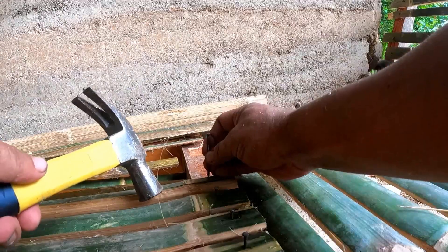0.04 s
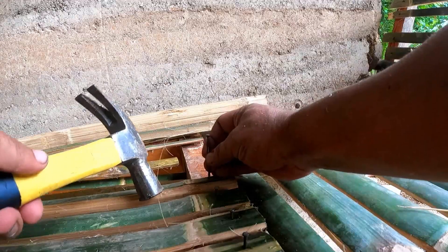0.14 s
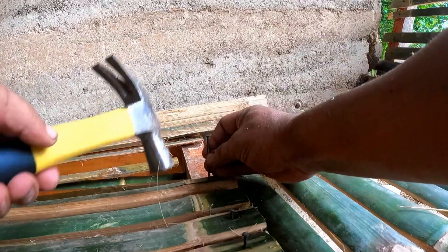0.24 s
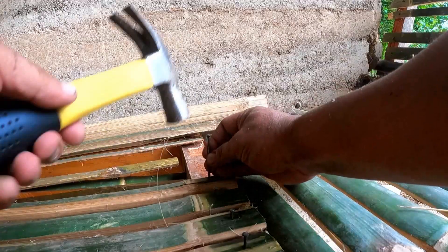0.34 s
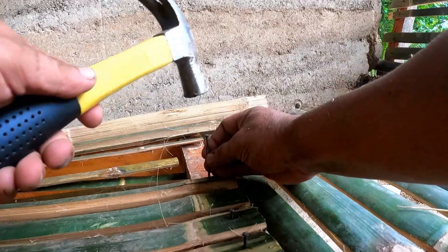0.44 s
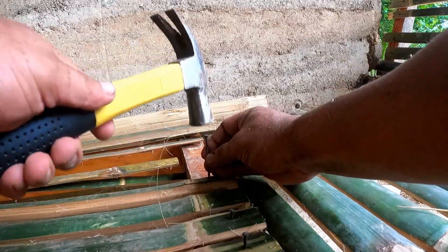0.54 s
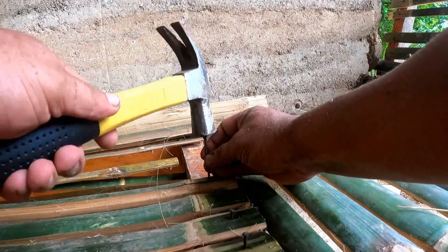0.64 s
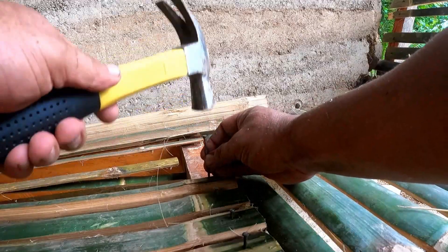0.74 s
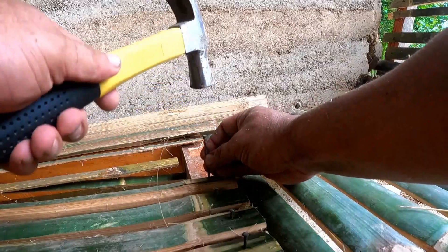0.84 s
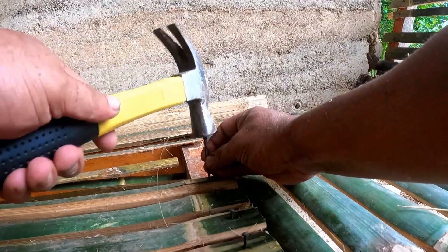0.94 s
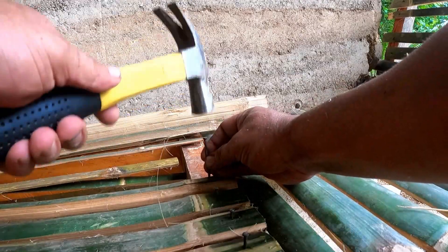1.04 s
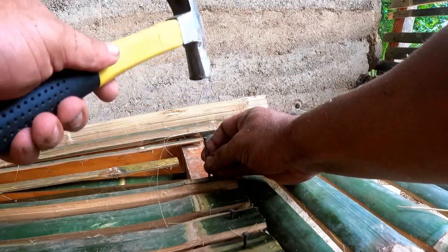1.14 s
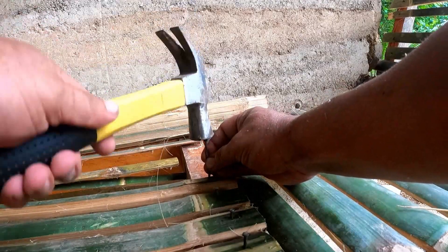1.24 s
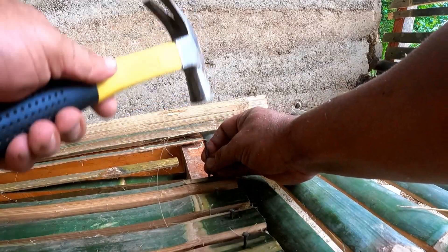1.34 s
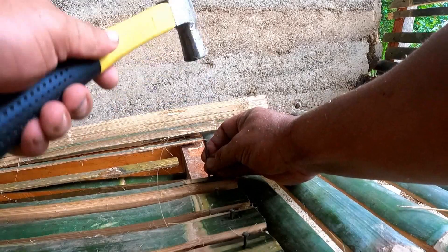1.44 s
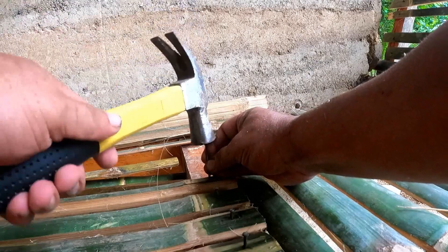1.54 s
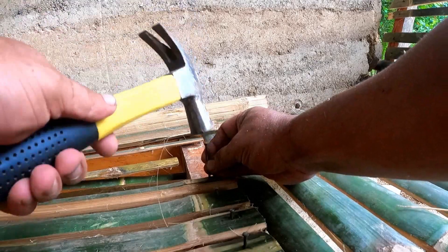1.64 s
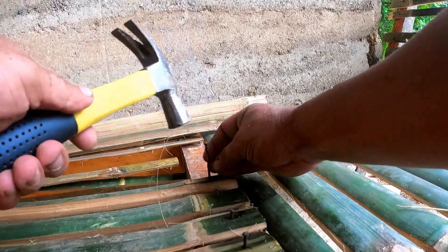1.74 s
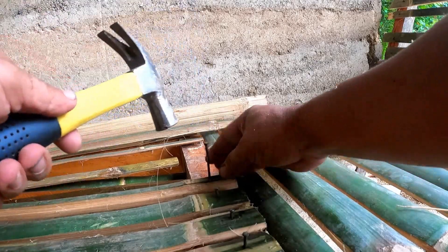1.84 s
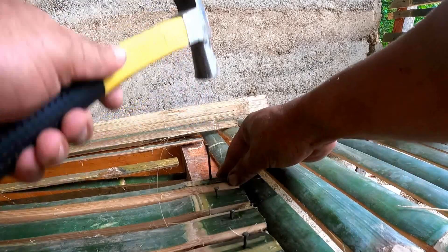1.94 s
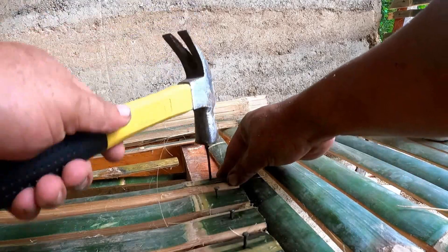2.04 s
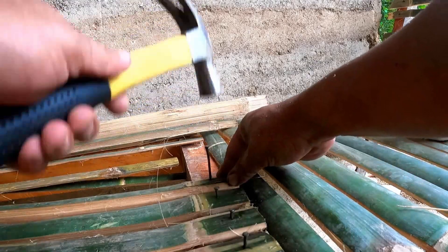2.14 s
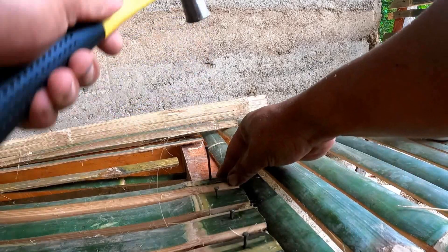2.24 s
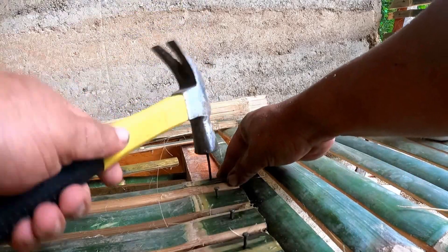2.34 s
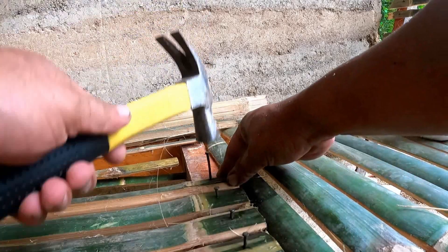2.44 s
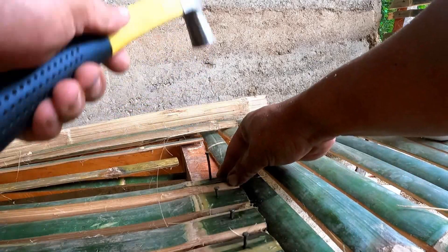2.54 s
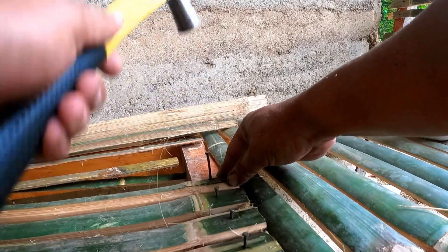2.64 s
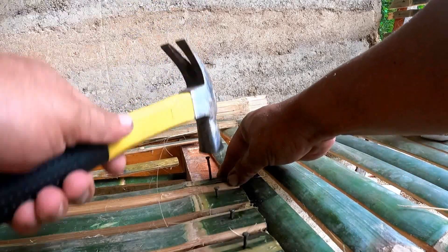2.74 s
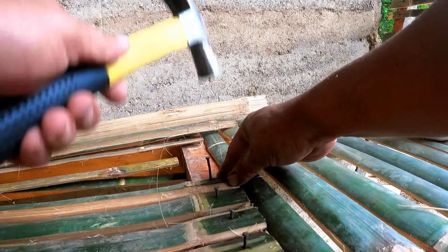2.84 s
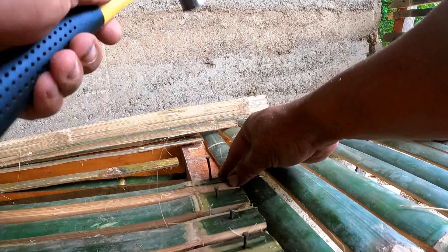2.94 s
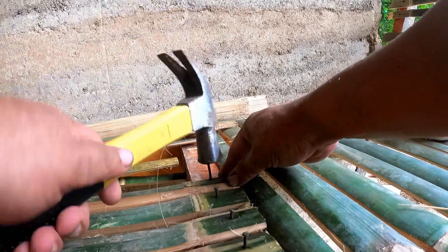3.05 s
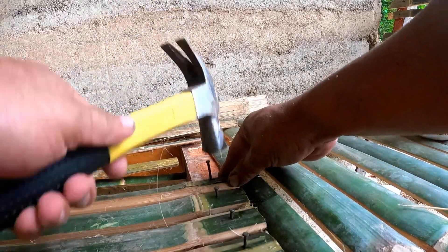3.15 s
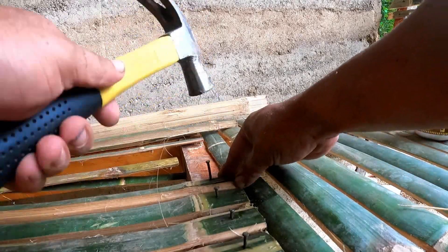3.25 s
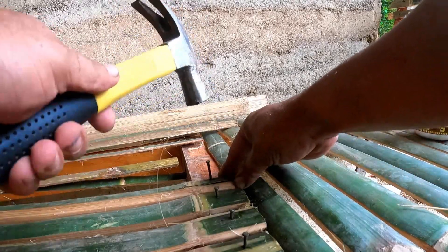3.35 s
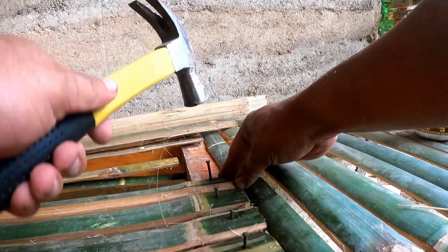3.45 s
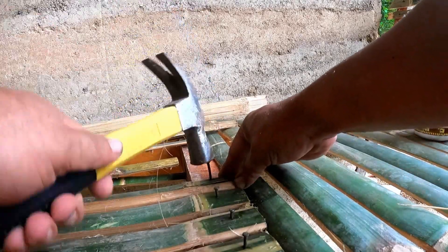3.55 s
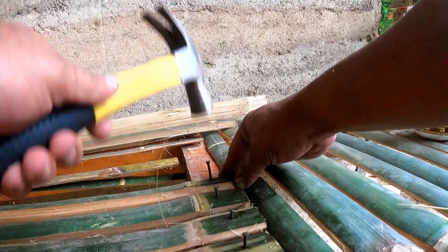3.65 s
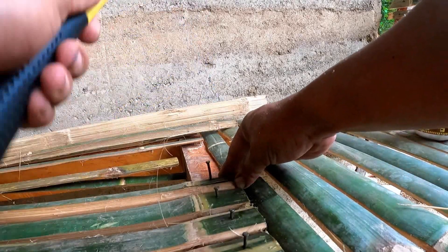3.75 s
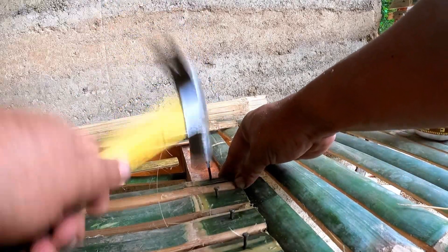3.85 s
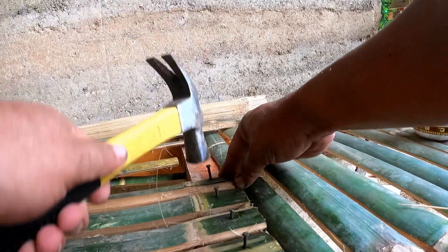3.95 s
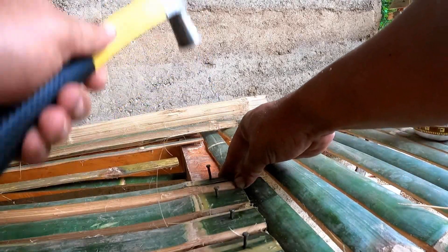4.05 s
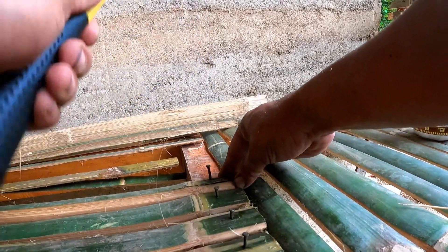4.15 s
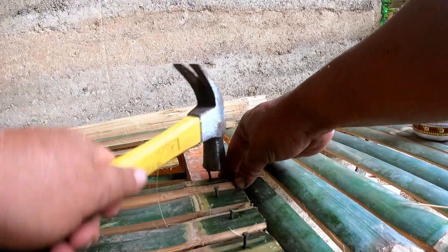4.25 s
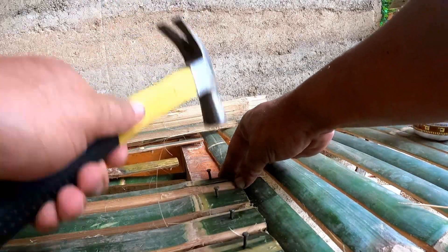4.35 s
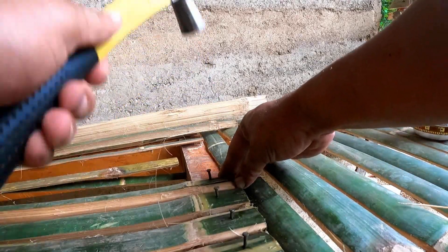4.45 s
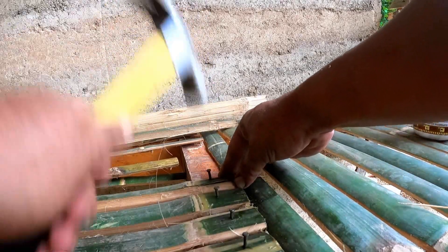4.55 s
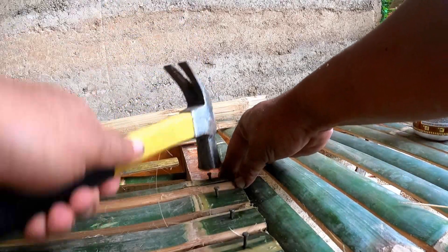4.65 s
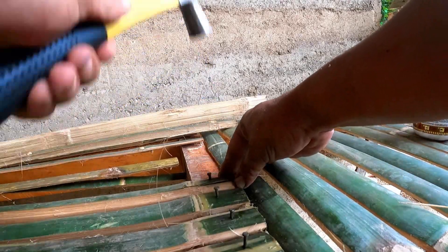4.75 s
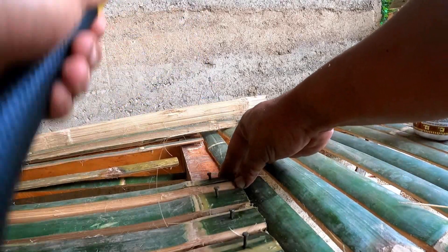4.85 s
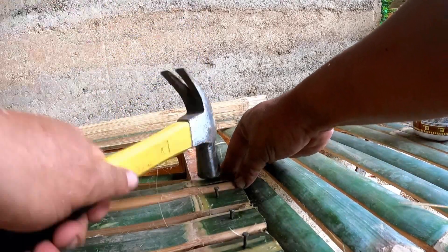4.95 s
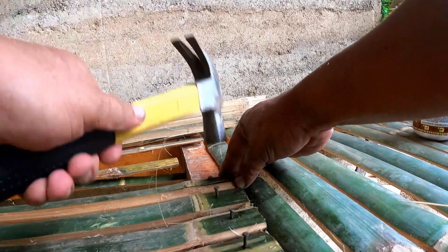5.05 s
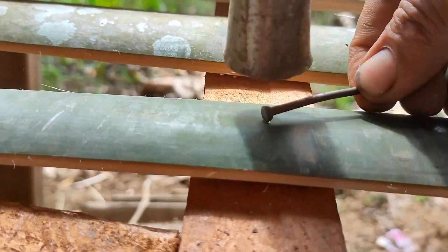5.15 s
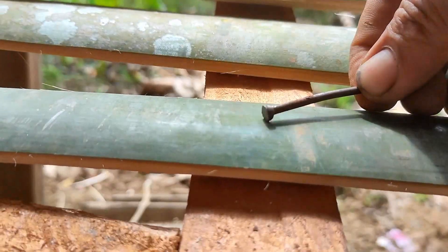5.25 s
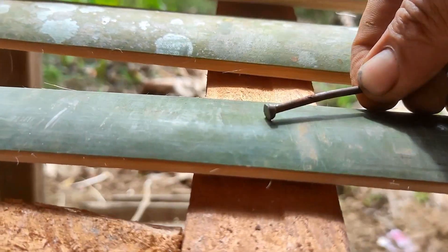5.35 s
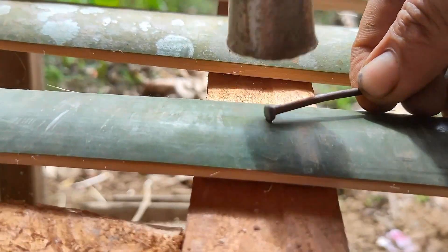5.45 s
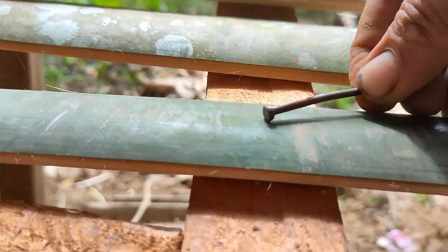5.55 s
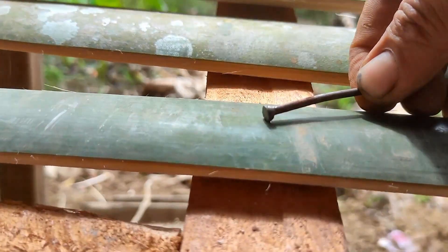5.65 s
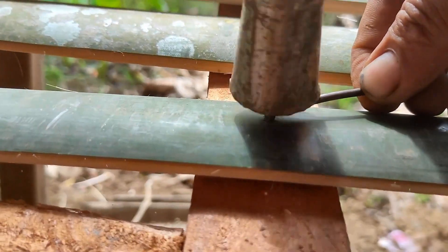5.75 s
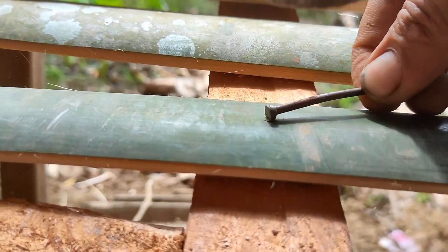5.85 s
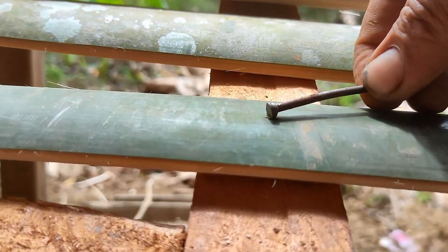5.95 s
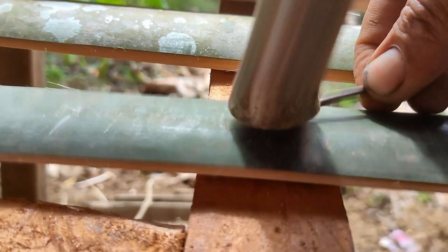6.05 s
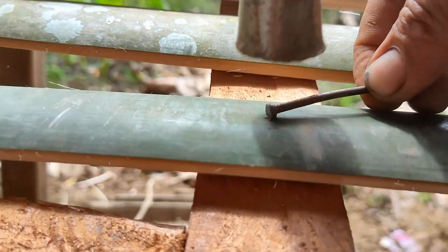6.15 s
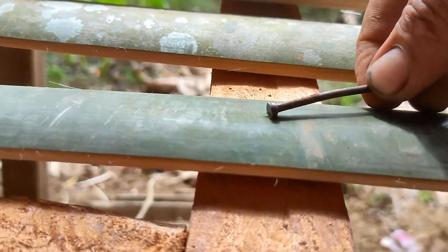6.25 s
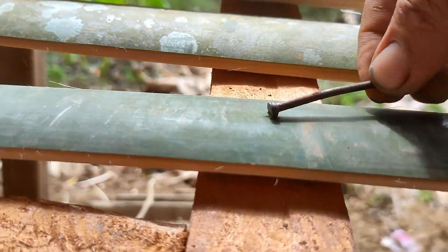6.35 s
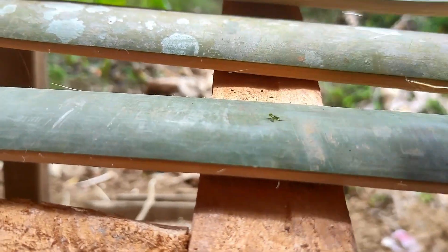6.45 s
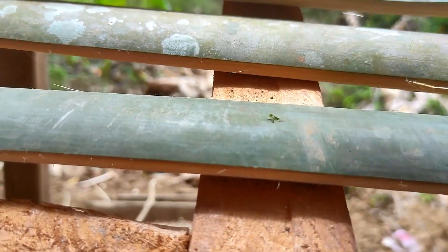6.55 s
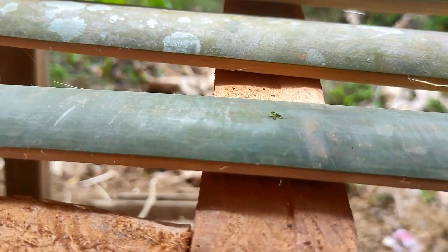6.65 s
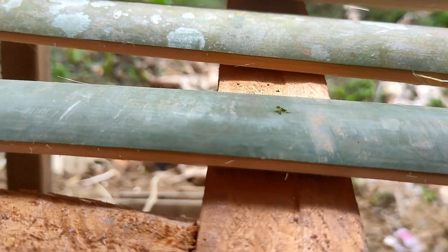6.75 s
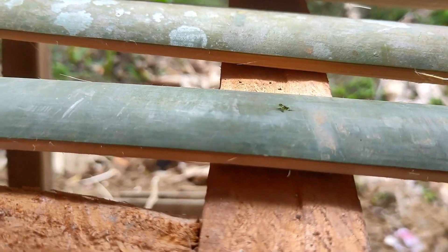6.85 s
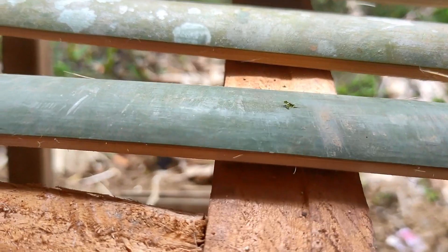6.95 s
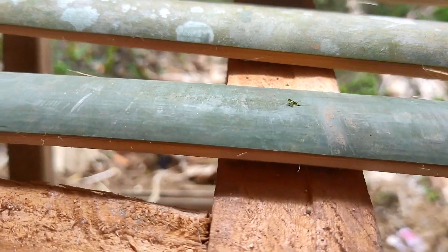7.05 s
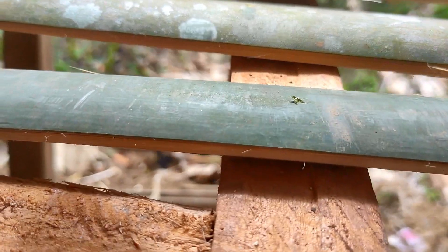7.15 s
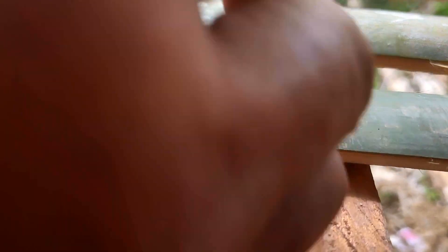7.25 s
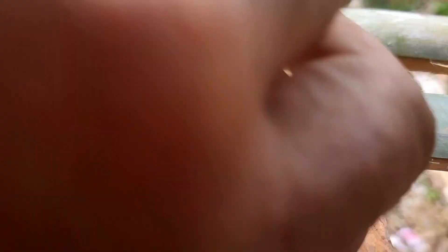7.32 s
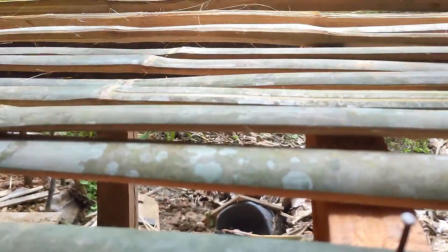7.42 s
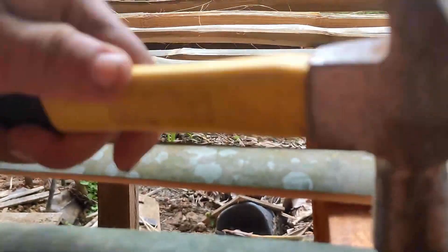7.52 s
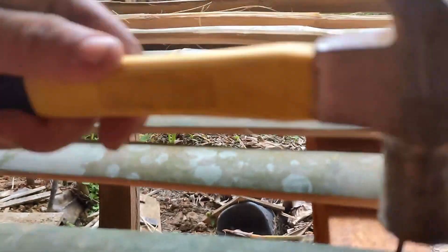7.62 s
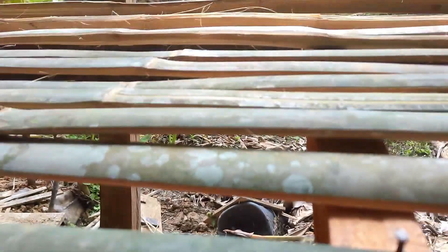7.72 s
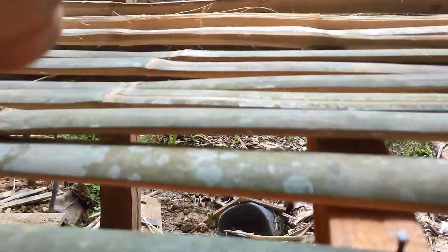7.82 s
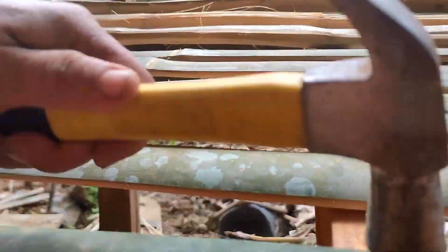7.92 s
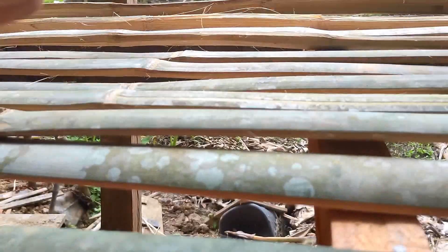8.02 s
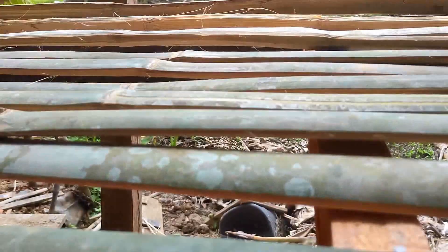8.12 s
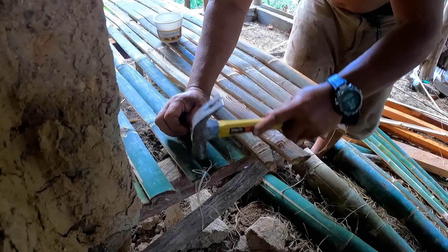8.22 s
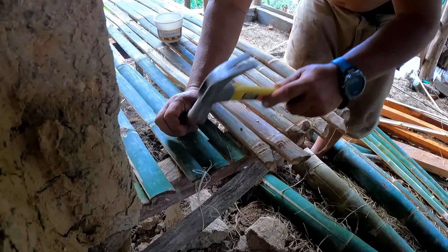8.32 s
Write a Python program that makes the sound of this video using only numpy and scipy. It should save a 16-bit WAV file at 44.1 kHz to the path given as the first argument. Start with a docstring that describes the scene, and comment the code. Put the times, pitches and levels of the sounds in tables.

```python
"""Outdoors, nails are hammered into a deck of split bamboo, heard in five shots cut together.
First, from the deck itself and in the centre: insects swell in, nail and hammer are handled softly, and blows
crack, shake the frame and make slats and loose nails bounce; modes and noise bands die away at their own rates.
Then, from close by and almost wholly at the left: dry clacks with a long, dark reverberation, soft bumps of the
hand and a far insect tone. Last, the deck returns for a moment, on the tail of one more blow."""
import sys
import numpy as np
from scipy import signal
from scipy.fft import rfft, irfft, next_fast_len
from scipy.io import wavfile
from scipy.ndimage import uniform_filter1d

SR = 44100
rng = np.random.default_rng(int(sys.argv[2]) if len(sys.argv) > 2 else 0)


def unload_audio(sound):
    """Save the sound as a 16-bit wav file, at the path given as the first command line argument."""
    columns = np.transpose(np.atleast_2d(sound))
    # keep every value between -1 and 1, then stretch to whole-number steps
    steps = np.round(np.clip(columns, -1, 1) * 32767)
    wavfile.write(sys.argv[1], SR, steps.astype(np.int16))


N = 369558

# All levels in the tables are relative.
# Shots from the deck. Each row: start in seconds, end in seconds.
DECK_SHOTS = [(-.01, 2.1), (2.1, 5.224), (8.287, 8.4)]
# Shots from close by. Each row: start in seconds, end in seconds, fade-out in seconds.
CLOSE_SHOTS = [(5.27, 7.485, .5), (7.495, 8.287, .003)]
# Blows heard from the deck; the first and the last fall just before their shot opens. Each row: start in
# seconds, then crack, steel tick, frame thump, slat clatter and faint fore-tick in dB, flight of the nails in
# seconds, their ring in dB, flight of the loose slat in seconds, its knock in dB.
DECK_BLOWS = [(-.4, -10, -5, -2, 1.5, -40, .04, -30, .1, -25),
              (0.9107, -15.5, -6, -4.5, -12, -39, .03, -55, 0.12, -38),
              (1.2295, -27.5, 3.5, -1, -1.5, -27.5, 0.038, -38.5, 0.07, -10.5),
              (1.5276, -4.5, 3, -1.5, 0, -25.5, .032, -14.5, 0.11, -25.5),
              (1.8188, -6.5, 1, -3, -3, -23, 0.046, -34, 0.11, -19),
              (2.305, -5, 4, -0.5, -4.5, -9, 0.031, -15, 0.11, -26),
              (2.6618, -4.5, 8.5, -1, -4, -21, 0.038, -20.5, 0.11, -16.5),
              (3.008, -7, 6, -2.5, -0.5, -27, 0.046, -19, 0.13, -25),
              (3.3538, -5.5, 7.5, -2, 2, -25, .039, -12.5, 0.1, -12.5),
              (3.829, -5, -18.5, -2, -2.5, -24, .031, -20.5, .043, -22),
              (4.170, -2.5, 5.5, -2, 1, -23, 0.048, -16, 0.1, -11.5),
              (4.5358, -5.5, 6.5, -4.5, 2, -24.5, 0.078, -22.5, .09, -16),
              (4.8886, -6.5, 4.5, -3, 1, -25.5, 0.045, -22, 0.12, -22.5),
              (8.21, 7, -2, -5.5, -6.5, -40, 0.039, -34, 0.042, -30)]
# Crack of the blow. Each row: frequency in Hz, level in dB per Hz, t60 in seconds.
CRACK_BANDS = [(250, 4, 0.014), (600, -11, 0.0092), (1350, 9, 0.012), (1900, -2, 0.012), (2840, -19, 0.013),
               (6000, -12.5, 0.042), (12500, -24, 0.023)]
# Hammer face on the nail head. Each row: frequency in Hz, level in dB, t60 in seconds.
CONTACT_MODES = [(1300, -1, .014), (1800, 1, .013), (2200, -5, .009)]
# Single bamboo slat. Each row: frequency in Hz, level in dB, t60 in seconds.
SLAT_MODES = [(759.5, -18.5, 0.038), (958, -18.5, 0.16), (1099, -15.5, 0.11), (1265, -11, 0.085),
              (1448, -17, 0.08), (1761, -14.5, 0.058), (2038, -14.5, 0.048)]
# Steel tick of the blow. Each row: frequency in Hz, level in dB per Hz, t60 in seconds.
STEEL_BANDS = [(1500, 4, 0.0021), (2960, -18, 0.01), (5460, -3.5, 0.0086), (8230, -5, 0.0089),
               (10100, -12.5, 0.01), (15800, 2, 0.0019)]
# Heavy frame of the deck. Each row: frequency in Hz, level in dB, t60 in seconds.
FRAME_MODES = [(50.6, -31, 1.2), (74.1, -24, 3.6), (99.7, -25, 1.7), (119, 8, 0.037), (162.8, -15.5, .26),
               (205, -27, 0.4), (278, -39, .2), (297.4, -23.5, 0.43)]
# Shaking of all the slats. Each row: frequency in Hz, level in dB per Hz, t60 in seconds.
CLATTER_BANDS = [(25.04, -8, 1.8), (45, 8, 1), (94, -9, 1.1), (173, 1, 1.01), (295, -5, 0.79),
                 (623, -14.5, 0.67), (1290, -12.5, 0.4), (2290, -15, 0.3), (2780, -19, 0.32),
                 (6500, -24.5, 0.26), (9900, -44, 0.26), (15000, -45.5, 0.11)]
# Loose nails ringing. Each row: frequency in Hz, level in dB, t60 in seconds.
NAIL_MODES = [(2565, -18, .08), (3368, 0, .1), (3392, -9, .07), (4022, -6, .095), (4328, -14, .07),
              (4817, -13, .08), (4974, -8, .1), (6042, -9, .09), (6880, -15, .06), (7860, -13, .06)]
# Loose nails buzzing on the slats. Each row: frequency in Hz, level in dB per Hz, t60 in seconds.
BUZZ_BANDS = [(1813, -21.5, .06), (2900, -3.5, 0.1), (4500, -6, 0.1), (6440, -15.5, 0.11), (9000, -22, .05),
              (14000, -36, .04)]
# Slat knocking on its beam. Each row: frequency in Hz, level in dB per Hz, t60 in seconds.
KNOCK_BANDS = [(300, 6.5, 0.064), (1100, 7, 0.061), (2200, 5, 0.02), (4030, -7.5, 0.063),
               (7530, -28, 0.024), (14000, -31.5, .03)]
# Insect chorus around the deck. Each row: frequency in Hz, level in dB per Hz.
INSECT_COLOUR = [(2000, -38), (3400, -8.5), (3850, 2.5), (4350, 2), (4850, -13.5), (6400, -16.5), (7400, 7),
                 (8400, 0), (9300, -2.5), (10100, -2), (10700, -3.5), (11600, 0), (12800, -10.5),
                 (14500, -27), (16000, -42)]
# Low sway of the deck in outdoor air. Each row: frequency in Hz, level in dB per Hz.
SWAY_COLOUR = [(20, -20), (40, -2), (68, 6.5), (110, -20), (300, -30), (600, -40.5), (1400, -34.5),
               (3000, -47), (8000, -54.5)]
# Trembling slats. Each row: frequency in Hz, level in dB per Hz.
TREMBLE_COLOUR = [(60, -18.5), (130, -4), (200, 3), (320, -3), (450, -13), (800, -41), (2000, -50)]
# Light scuffs of nail and hammer being handled. Each row: start in seconds, level in dB, length in seconds.
SCUFFS = [(0.177, -31, 0.042), (0.361, -39, .03), (0.639, -28.5, .09)]
# Tiny tick within a scuff. Each row: frequency in Hz, level in dB per Hz, t60 in seconds.
TICK_BANDS = [(300, -15, 0.016), (1500, -0.5, 0.023), (3500, -6, 0.033), (7000, -2, .025),
              (15000, -20, .02)]
# How much the two microphone ports differ on the deck. Each row: frequency in Hz, side against mid in dB.
PORT_WIDTH = [(20, -20), (200, -20), (380, -12.5), (1290, -8), (2400, -6), (8000, -6), (15000, -6.5)]
# Blows heard from close by. Each row: start in seconds, then clack level, treble, hollow ring
# and reverberation in dB.
CLOSE_BLOWS = [(5.244, 4, -11, -19, -0.5), (5.5871, 1.5, -1, -15, 4.5), (5.927, 0.5, 3, -17, 7),
               (6.249, 2.5, -1, -18, 9), (7.439, -13.5, 10, -11, 5), (7.7755, -8.5, 11, -3, 8),
               (8.0935, -5.5, 11.5, 2.5, 11.5)]
# Dry bamboo clack. Each row: frequency in Hz, level in dB per Hz, t60 in seconds.
CLACK_BANDS = [(51, -39, 0.26), (177, 7.5, 0.098), (388, -1.5, 0.19), (694, 2, 0.17), (1100, 0.5, 0.19),
               (1950, 1, 0.14), (2550, -8, 0.2), (3470, -1.5, 0.1), (5060, -21, 0.14), (6800, -6.5, 0.11),
               (9260, -19.5, 0.084), (15500, -22.5, 0.098)]
# Hollow ring of the bamboo. Each row: frequency in Hz, level in dB per Hz, t60 in seconds.
HOLLOW_BANDS = [(150, -11, .2), (360, 0.5, 0.23), (665, 4, 0.25), (900, -13, 0.24), (1500, -21.5, .1)]
# Reverberation of the close blows. Each row: frequency in Hz, level in dB per Hz, t60 in seconds.
REVERB_BANDS = [(39.94, -38, 1.5), (100, -19, 3.5), (141, -17, 1.36), (206, -6.5, 1.45), (284, -11.5, 1.02),
                (464, -9.5, 0.93), (696, -19, 0.83), (1010, -27.5, 0.86), (2010, -36, 1.04),
                (3620, -35, 0.59), (5460, -40.5, 0.44), (6750, -33.5, 0.59), (9750, -56.5, 0.97),
                (15500, -54.5, 0.76)]
# Thin, far insect tone of the close shots. Each row: frequency in Hz, level in dB per Hz.
TRILL_COLOUR = [(2000, -13), (6000, -13.5), (8400, -6.5), (8740, 3.5), (9100, -7), (9800, 0.5),
                (10500, -9.5), (13000, -16.5)]
# Still air of the close shots. Each row: frequency in Hz, level in dB per Hz.
STILL_COLOUR = [(30, -11), (150, 0), (300, -7), (600, -7.5), (2000, -16), (4000, -25), (9000, -39)]
# Faint air, nearly all that the right channel holds in the close shots.
# Each row: frequency in Hz, level in dB per Hz.
RIGHT_AIR_COLOUR = [(30, -4), (70, -11), (140, -3.5), (270, -1), (600, -6), (1300, -13), (3000, -20.5),
                    (7000, -29), (15000, -33)]
# Soft bumps of the hand on the slats. Each row: start in seconds, level in dB.
BUMPS = [(6.845, -17.5), (6.914, -2.5), (6.981, -17), (7.116, -25)]
# Sound of one bump. Each row: frequency in Hz, level in dB per Hz, t60 in seconds.
BUMP_BANDS = [(40.5, -25, 0.1), (110, 6.5, 0.12), (233, 2.5, 0.088), (410, -16, 0.05), (643, -40, 0.045),
              (1200, -65, .04)]

TIME = np.arange(N) / SR
AGE = TIME[:int(1.6 * SR)]  # seconds since a single sound began
FORE_TICK_S = 0.0093  # a faint tick with the colour of the crack comes this far ahead of it
# each rebound keeps a share of the flight before it and loses some level
NAIL_REBOUND, NAIL_LOSS_DB = .5, 4.5
SLAT_REBOUND, SLAT_LOSS_DB = .26, 5
JOLT_DB = 0.5  # how strongly the landing slat sets the nails off again
# sway and trembling at rest, what a blow with a 0 dB thump adds, and how long that takes to settle
SWAY_REST_DB, TREMBLE_REST_DB = -41.5, -66
SWAY_DB, TREMBLE_DB, SETTLE_T60_S = -32, -40.5, 2.45
# insects before suppression, how far below that they start, and the time constant of their swell
INSECT_DB, SWELL_DB, SWELL_S = -41.5, 6, 0.44
# the suppressor of the insects: treble level where it starts to act, ratio, averaging time constant
DUCK_THRESHOLD_DB, DUCK_RATIO, DUCK_AVERAGE_S = -49, 10, 2.5
STILL_DB, TRILL_DB, RIGHT_AIR_DB, RIGHT_LEAK_DB = -61, -62.5, -57.5, -44
DECK_TOP_HZ, TOP_HZ = 12500, 16000  # upper limits of the deck ports and of the whole sound


def undb(db):
    """Turn decibels into an amplitude factor."""
    return 10 ** (np.asarray(db) / 20)


def decay(t, t60):
    """Exponential decay that loses 60 dB in t60 seconds."""
    return np.exp(-np.log(1000) * t / t60)


def fade(t60):
    """Decay over the age of a single sound; one minus it is a soft onset."""
    return decay(AGE, t60)


def add(track, s, sound):
    """Mix a sound into a track from time s on; what falls outside the track is lost."""
    i = int(s * SR)
    part = sound[max(0, -i):len(track) - i]
    first = max(0, i)
    track[first:first + len(part)] += part


def shot(start, end, fade_s=.001):
    """Open only while the shot lasts; it may fade out at its end."""
    gate = (TIME > start) * np.clip((end - TIME) / fade_s, 0, 1)
    return uniform_filter1d(gate, size=128)


def log_place(n, hz, values):
    """Interpolate values over log frequency for the bins of an n-point spectrum."""
    bins_hz = np.arange(n // 2 + 1) * SR / n
    return np.interp(np.log(bins_hz + 1), np.log(hz), values)


def tint(x, spectrum):
    """Give a sound a colour by filtering its spectrum with (Hz, dB) points."""
    hz, db = np.transpose(spectrum)
    n = next_fast_len(N, True)
    gain = undb(log_place(n, hz, db))
    return irfft(rfft(x, n) * gain, n)[:N]


def hiss(spectrum):
    """Steady noise of unit rms with a given colour."""
    x = tint(rng.standard_normal(N), spectrum)
    return x / x.std()


def dense(bands, treble_db=0):
    """Countless close modes: noise in which each band dies at its own rate."""
    hz, db, t60 = np.transpose(bands)
    length_s = min(1.3, 1.5 * t60.max())
    n = next_fast_len(int(length_s * SR), True)
    # neighbouring bands overlap as triangles on a log-frequency axis
    index = np.arange(len(hz))
    shares = np.maximum(0, 1 - abs(log_place(n, hz, index) - index[:, None]))
    parts = irfft(shares * rfft(rng.standard_normal(n)), n)
    gains = undb(db + treble_db * hz / (hz + 3000))
    sound = gains @ (parts * decay(AGE[:n], t60[:, None]))
    return np.pad(sound, (0, len(AGE) - n))


def ring(modes, detune, scatter_db):
    """Single modes set off at once; each blow weights and tunes them a little differently."""
    out = np.zeros(len(AGE))
    for hz, db, t60 in modes:
        a, b = rng.standard_normal(2)
        t = AGE[:int(1.2 * t60 * SR)]
        wave = np.sin(2 * np.pi * hz * (1 + detune * a) * t)
        out[:len(t)] += undb(db + scatter_db * b) * wave * decay(t, t60)
    return out


def chatter(sound, spread_s, count):
    """A loose piece touches down once, then again at chance moments, more lightly the later they fall."""
    out = sound.copy()
    for u, size in rng.uniform(0, 1, (count, 2)):
        i = 1 + int(u * spread_s * SR)
        out[i:] += (1 - u) * size * sound[:-i]
    return out


def crack():
    """Hammer face and nail head ring briefly while the slat under them cracks and rings."""
    contact = ring(CONTACT_MODES, detune=0.072, scatter_db=-3.0)
    slat = ring(SLAT_MODES, detune=0.0042, scatter_db=4.0)
    return dense(CRACK_BANDS) + contact + undb(-2.5) * slat


def frame_thump():
    """The heavy frame is pushed down and gives way after the crack."""
    return -ring(FRAME_MODES, detune=0.013, scatter_db=1.5) * (1 - fade(.028))


def rattle(count, spread_s, db):
    """Slats chattering on their beams: small knocks at chance moments, the later the weaker."""
    out = np.zeros(len(AGE))
    for u, size in rng.uniform(0, 1, (count, 2)):
        i = 1 + int((0.011 + u * spread_s) * SR)
        knock = ring(SLAT_MODES, detune=0.033, scatter_db=4.0)
        out[i:] += undb(db - 10 * u) * (.5 + size) * knock[:-i]
    return out


def clatter():
    """The shaking takes a moment to spread through the slats, and keeps the loose nails humming."""
    slats = dense(CLATTER_BANDS) * (1 - fade(0.0057)) + rattle(count=12, spread_s=.115, db=-19)
    nails = chatter(ring(NAIL_MODES, detune=0.00089, scatter_db=-2.0), spread_s=0.081, count=8)
    return slats + undb(-25) * nails


def deck_blow(crack_db, steel_db, thump_db, clatter_db):
    """Steel meets the nail, the slat cracks, the frame is pushed down and the whole deck rattles."""
    out = undb(crack_db) * crack()
    out += undb(steel_db) * dense(STEEL_BANDS)
    out += undb(thump_db) * frame_thump()
    return out + undb(clatter_db) * clatter()


def nail_jingle():
    """The nails lying on the slats buzz and jingle."""
    nails = ring(NAIL_MODES, detune=0.00092, scatter_db=1.5) + undb(2.5) * dense(BUZZ_BANDS)
    return chatter(undb(-5) * nails, spread_s=.018, count=2) * (1 - fade(0.0041))


def slat_knock():
    """A slat knocks back on its beam."""
    wood = dense(KNOCK_BANDS) + undb(1.5) * ring(SLAT_MODES, detune=0.006, scatter_db=-2.5)
    return chatter(undb(-6) * wood, spread_s=0.036, count=3) * (1 - fade(0.0056))


def landings(touch, flight_s, rebound, loss_db, count):
    """A piece thrown up by a blow lands after its flight, then hops on, each hop shorter and weaker."""
    out = np.zeros(len(AGE))
    flights = flight_s * rebound ** np.arange(count)
    for k, s in enumerate(np.cumsum(flights)):
        add(out, s, undb(-k * loss_db) * touch())
    return out


def loose_pieces(nail_s, nail_db, slat_s, slat_db):
    """Loose nails and a loose slat come down again; the slat jolts the nails once more."""
    out = undb(nail_db) * landings(nail_jingle, nail_s, NAIL_REBOUND, NAIL_LOSS_DB, count=3)
    out += undb(slat_db) * landings(slat_knock, slat_s, SLAT_REBOUND, SLAT_LOSS_DB, count=2)
    add(out, slat_s, undb(slat_db + nail_db + JOLT_DB) * nail_jingle())
    return out


def insect_chorus():
    """Insects around the deck: coloured noise that swells in at the start."""
    return hiss(INSECT_COLOUR) * undb(INSECT_DB - SWELL_DB * np.exp(-TIME / SWELL_S))


def ducking(x):
    """Gain of a suppressor that turns the insects down as loud treble builds up, and lets go slowly."""
    step = 1 / (DUCK_AVERAGE_S * SR)
    # the slope of the wave favours its treble
    level = np.sqrt(signal.lfilter([step], [1, step - 1], np.gradient(x) ** 2))
    return np.maximum(1, level / undb(DUCK_THRESHOLD_DB)) ** (1 / DUCK_RATIO - 1)


def deck():
    """Blows shake the deck and throw up loose pieces, over insects; each cut ends whatever still rings."""
    insects = insect_chorus()
    sway, tremble = hiss(SWAY_COLOUR), hiss(TREMBLE_COLOUR)
    at_rest = undb(SWAY_REST_DB) * sway + undb(TREMBLE_REST_DB) * tremble
    shaken = undb(SWAY_DB) * sway + undb(TREMBLE_DB) * tremble
    out, before = 0, -np.inf
    for start, end in DECK_SHOTS:
        track, shaking = np.zeros((2, N))
        for s, crack_db, steel_db, thump_db, clatter_db, fore_db, *loose in DECK_BLOWS:
            # a shot also holds the tail of a blow struck since the deck shot before it
            if before < s < end:
                add(track, s - FORE_TICK_S, undb(fore_db) * dense(CRACK_BANDS))
                add(track, s, deck_blow(crack_db, steel_db, thump_db, clatter_db) + loose_pieces(*loose))
                add(shaking, s, undb(thump_db) * fade(SETTLE_T60_S))
        track = track + at_rest + shaking * shaken + ducking(track) * insects
        out = out + track * shot(start, end)
        before = end
    return out


def handling():
    """Nail and hammer are set in place: short, soft clusters of tiny ticks."""
    out = np.zeros(N)
    for s, db, length_s in SCUFFS:
        scuff = chatter(dense(TICK_BANDS, treble_db=-4), spread_s=length_s, count=24)
        add(out, s, undb(db) * scuff * (1 - fade(length_s)))
    return out


def ports(x, smear_s=0.067):
    """Two microphone ports hear the slats a little differently, overload on the cracks and lose the top."""
    paths = rng.standard_normal(len(AGE)) * fade(smear_s)
    smeared = signal.fftconvolve(x, paths / np.linalg.norm(paths))[:N]
    side = tint(smeared, PORT_WIDTH)
    pair = np.tanh([x + side, x - side])
    return signal.sosfilt(signal.butter(4, DECK_TOP_HZ, fs=SR, output="sos"), pair)


def clack(db, treble_db, hollow_db):
    """Struck bamboo from close by: a dry clack and a hollow ring, with a short soft onset."""
    dry_clack = undb(db) * dense(CLACK_BANDS, treble_db)
    hollow = undb(hollow_db) * dense(HOLLOW_BANDS)
    return (dry_clack + hollow) * (1 - fade(0.0032))


def reverberation(late_s=0.099, early_share=0.49):
    """Dark reverberation that starts thin and swells when its late part arrives."""
    early = early_share * (1 - fade(0.15))
    late = (1 - early_share) * np.clip((AGE - late_s) / 0.0083, 0, 1)
    return (early + late) * dense(REVERB_BANDS)


def hand_bump():
    """A hand bumps the slats: dull, short modes with a soft onset."""
    return dense(BUMP_BANDS) * (1 - fade(0.014))


def close():
    """Blows heard from close by, a few bumps of the hand and a far insect tone in still air."""
    calm = undb(TRILL_DB) * hiss(TRILL_COLOUR) + undb(STILL_DB) * hiss(STILL_COLOUR)
    for s, db in BUMPS:
        add(calm, s, undb(db) * hand_bump())
    out = 0
    for start, end, fade_s in CLOSE_SHOTS:
        track = calm.copy()
        for s, db, treble_db, hollow_db, reverb_db in CLOSE_BLOWS:
            # a shot may open on the tail of a blow struck just before it
            if start < s + .1 < end:
                add(track, s, clack(db, treble_db, hollow_db) + undb(reverb_db) * reverberation())
        out = out + track * shot(start, end, fade_s)
    return out


def right_air():
    """Faint steady air on the right while a close shot is open."""
    return undb(RIGHT_AIR_DB) * hiss(RIGHT_AIR_COLOUR) * sum(shot(*row) for row in CLOSE_SHOTS)


def scene():
    """The deck is heard in the centre; the close shots are at the far left, with little but air on the right."""
    left, right = ports(deck() + handling())
    near = close()
    return np.array([left + near, right + undb(RIGHT_LEAK_DB) * near + right_air()])


def record(dry):
    """The recorder cuts the deepest bass, clips the sharpest cracks and cuts the top."""
    x = signal.sosfilt(signal.butter(2, 22, "high", fs=SR, output="sos"), dry)
    clipped = np.clip(x, -1, 1)
    return signal.sosfilt(signal.ellip(8, .2, 70, TOP_HZ, fs=SR, output="sos"), clipped)


dry = scene()
out = record(dry)
unload_audio(out)
```